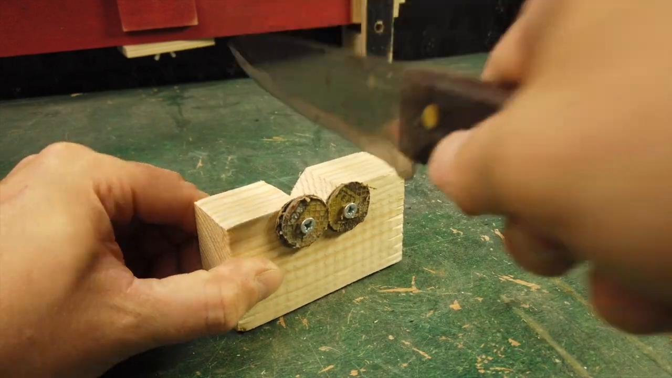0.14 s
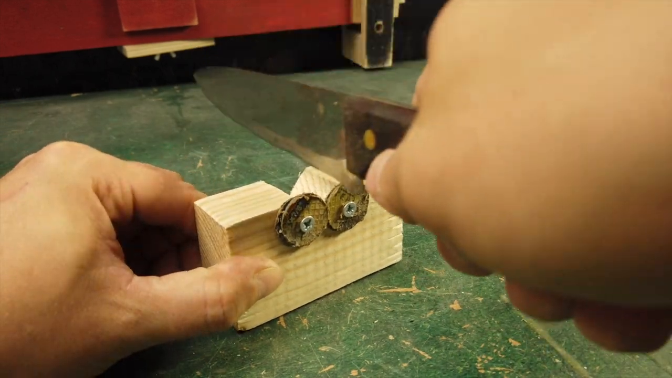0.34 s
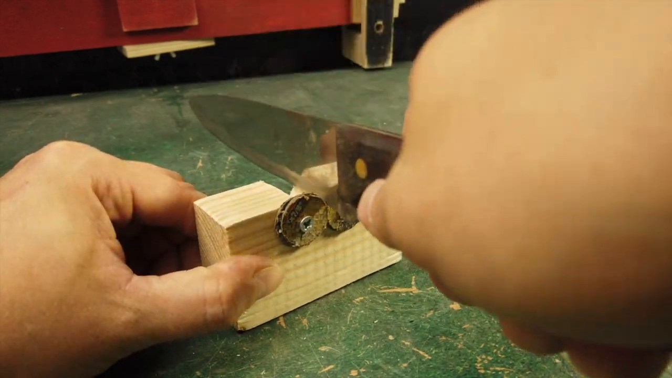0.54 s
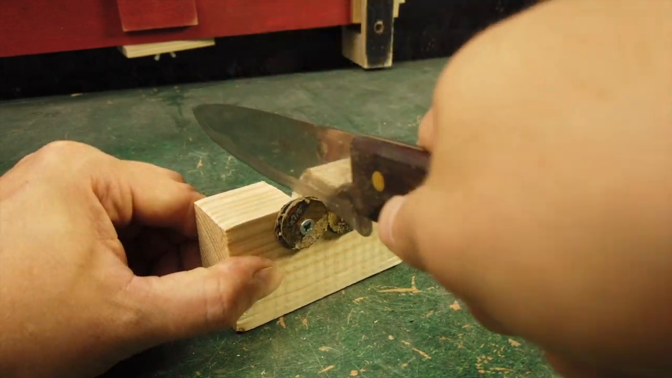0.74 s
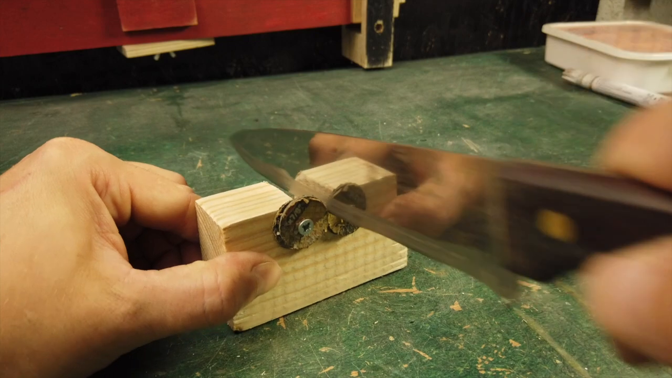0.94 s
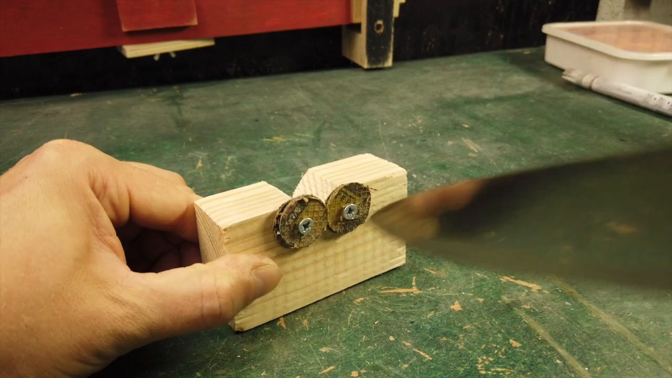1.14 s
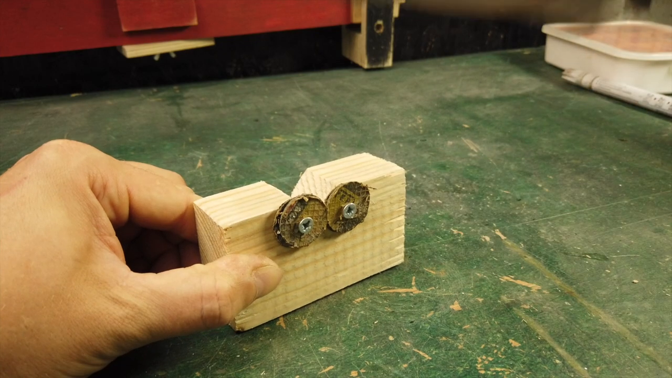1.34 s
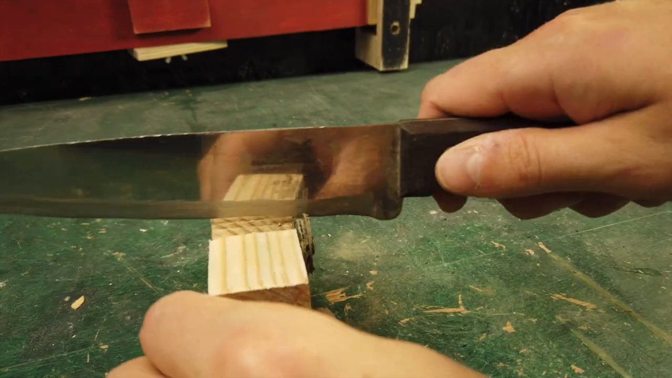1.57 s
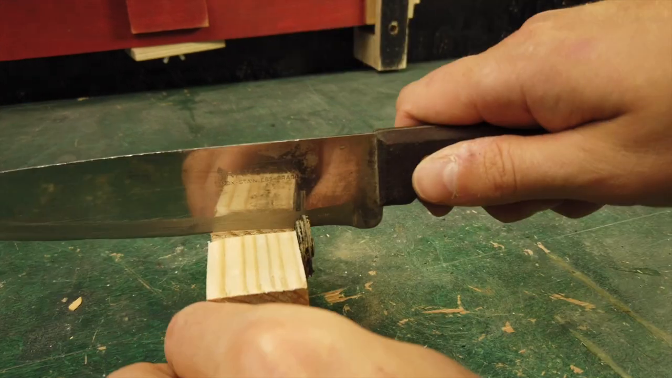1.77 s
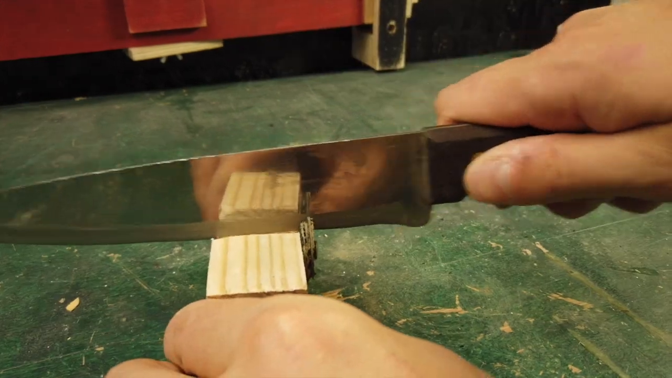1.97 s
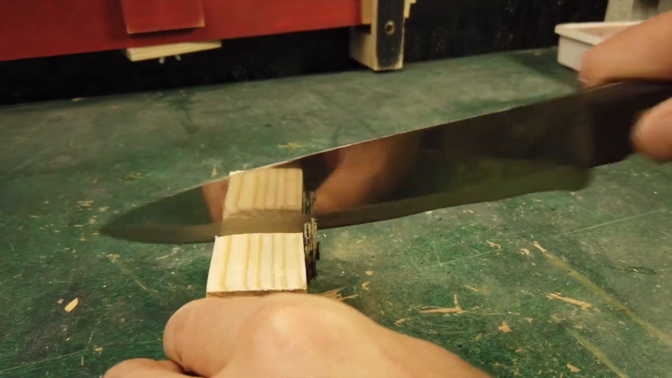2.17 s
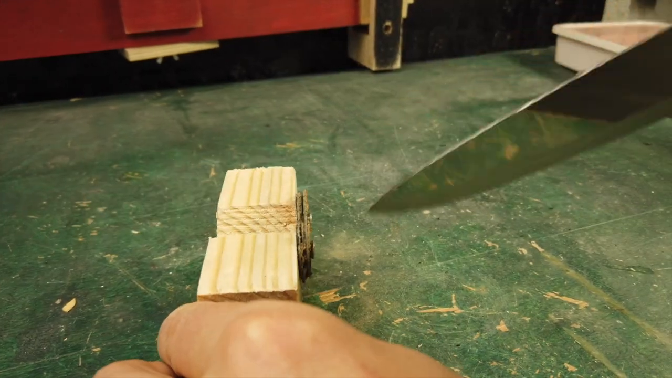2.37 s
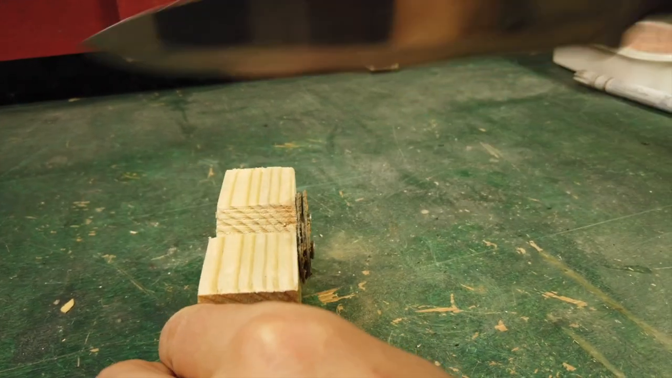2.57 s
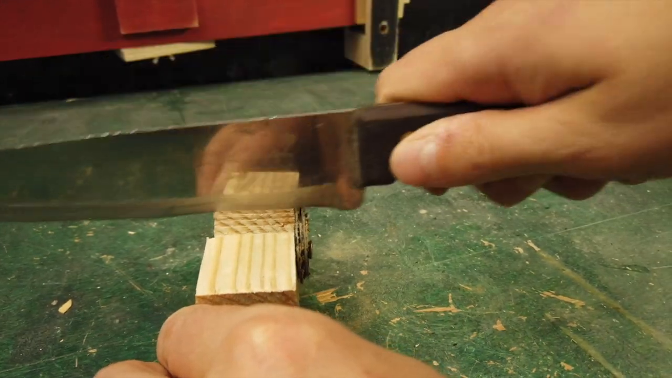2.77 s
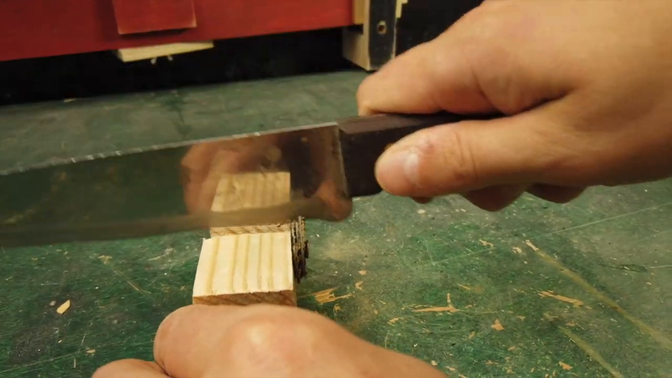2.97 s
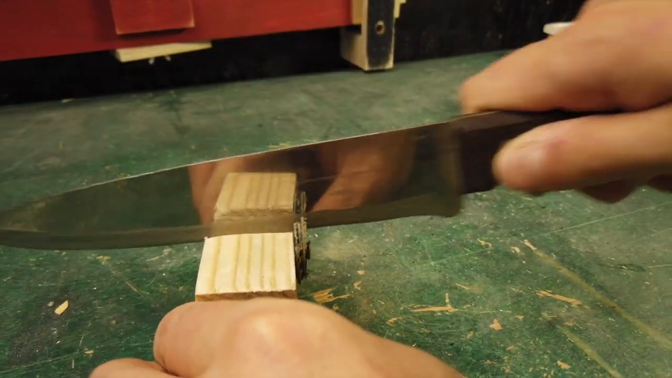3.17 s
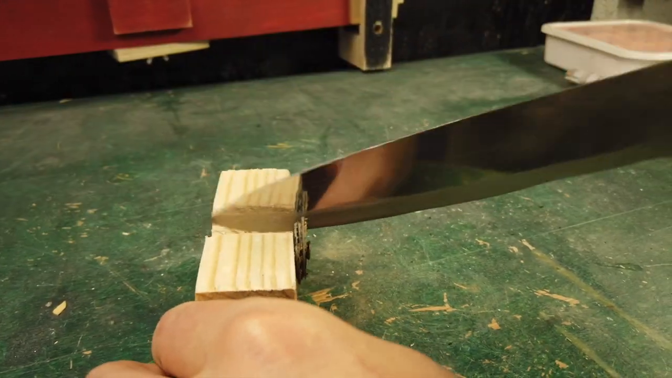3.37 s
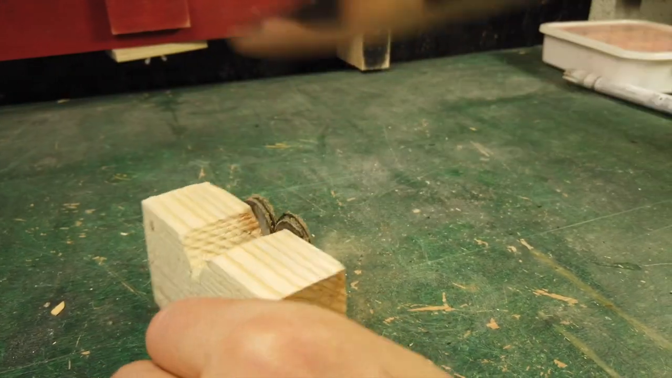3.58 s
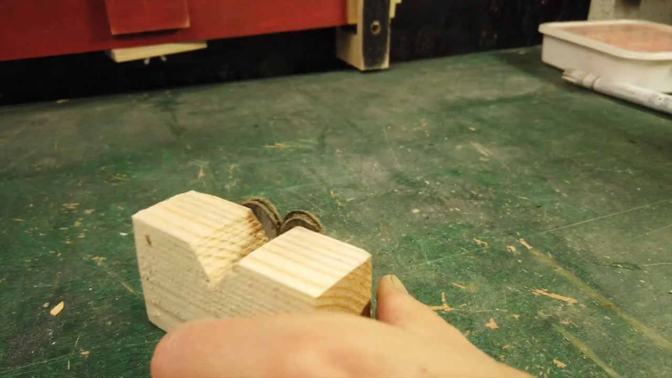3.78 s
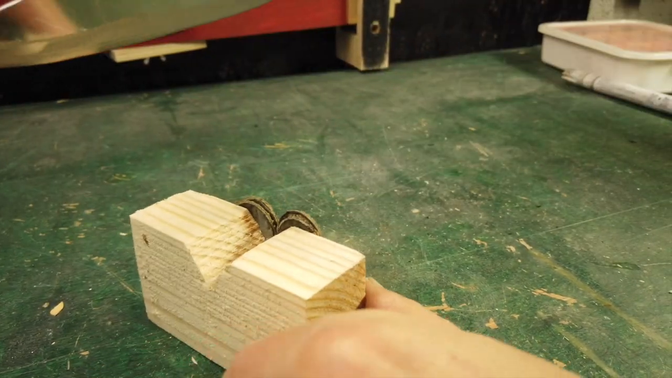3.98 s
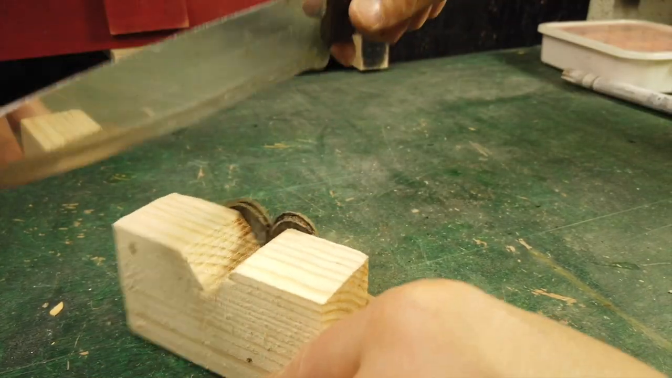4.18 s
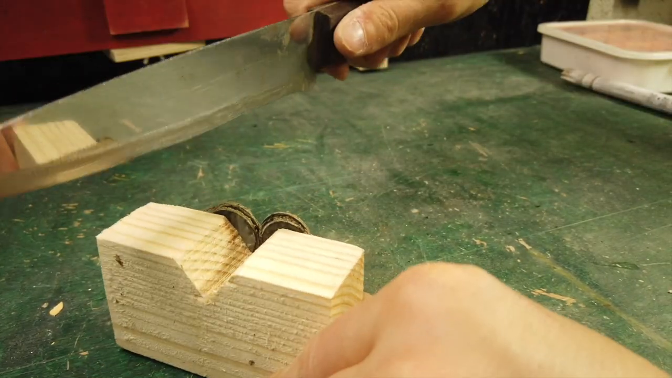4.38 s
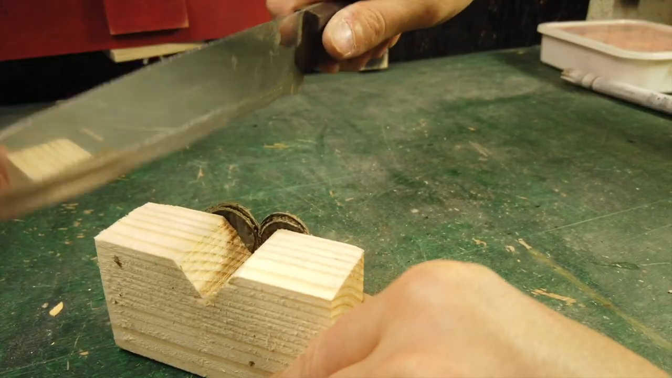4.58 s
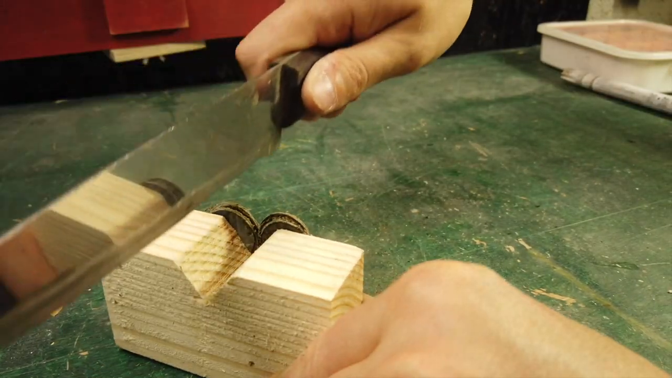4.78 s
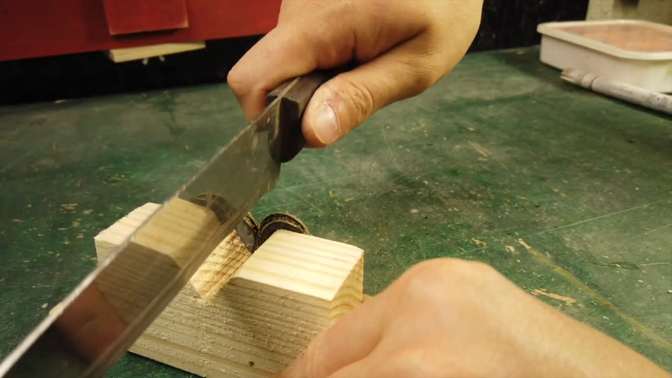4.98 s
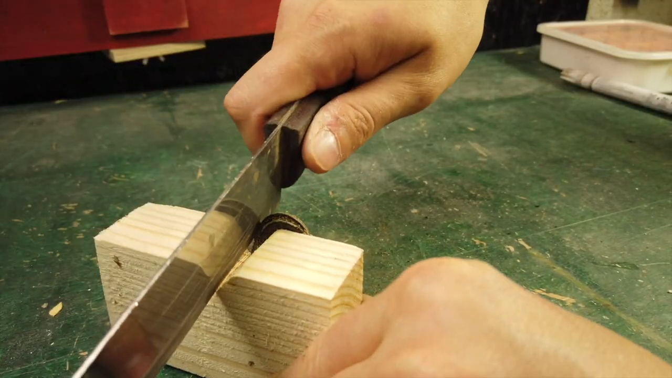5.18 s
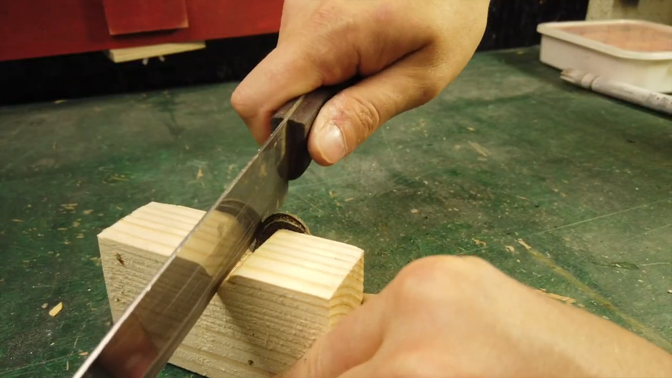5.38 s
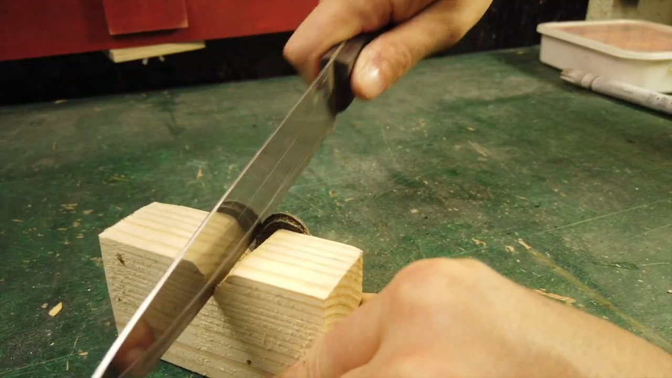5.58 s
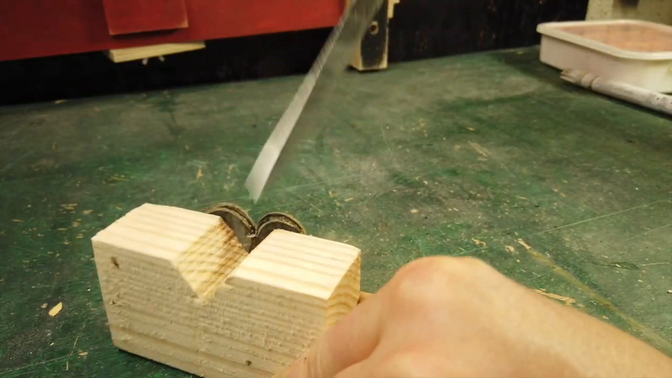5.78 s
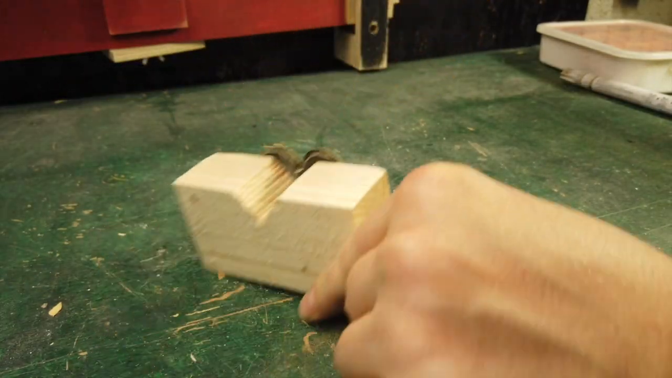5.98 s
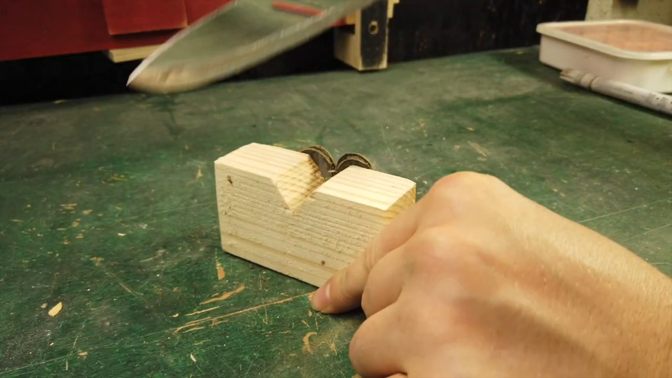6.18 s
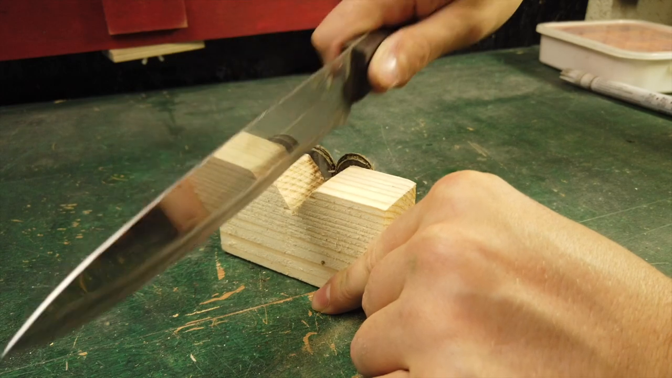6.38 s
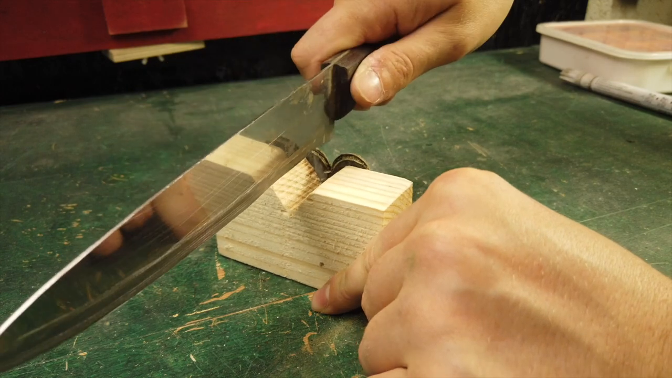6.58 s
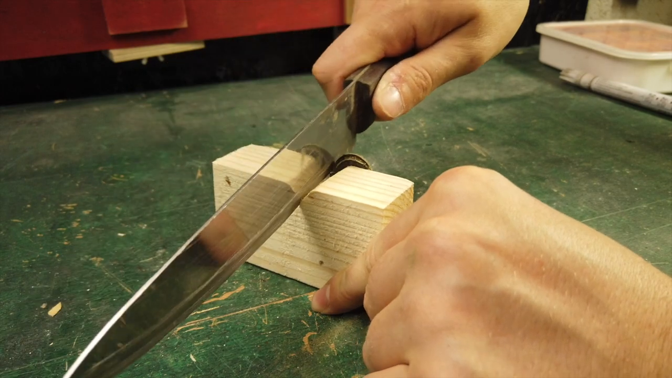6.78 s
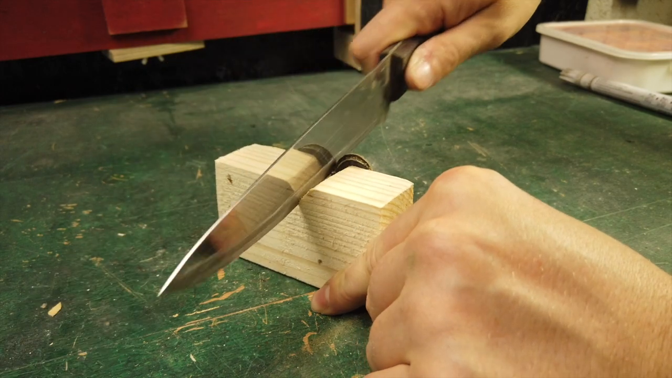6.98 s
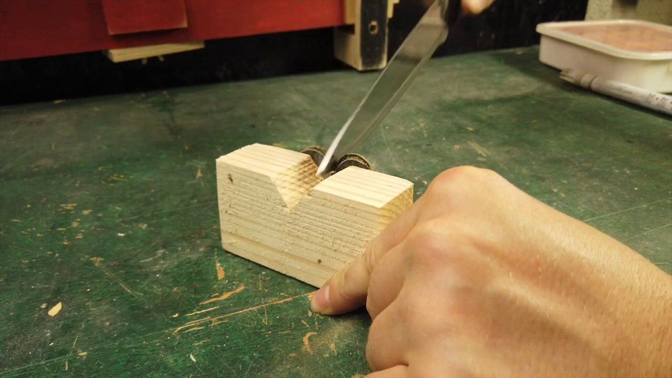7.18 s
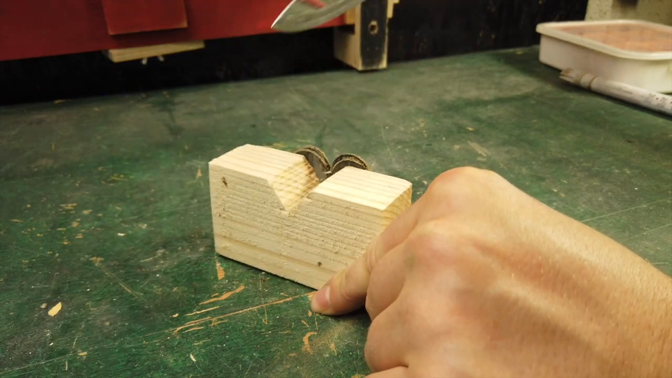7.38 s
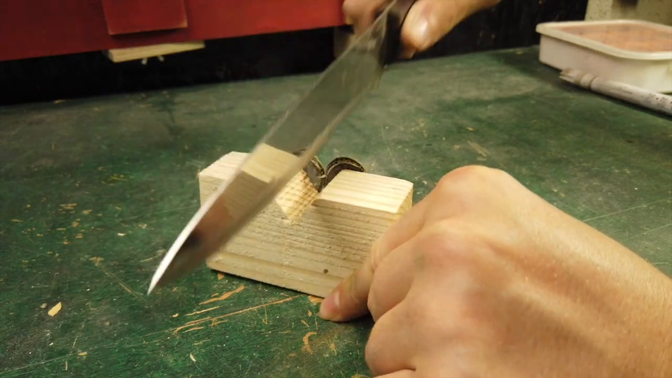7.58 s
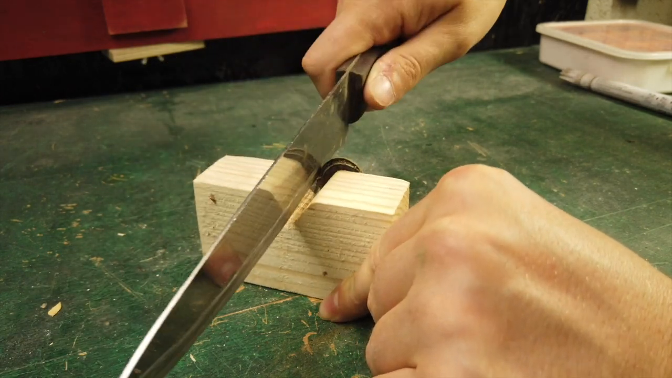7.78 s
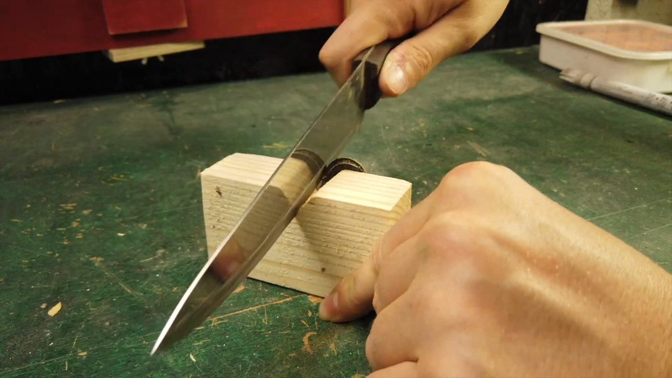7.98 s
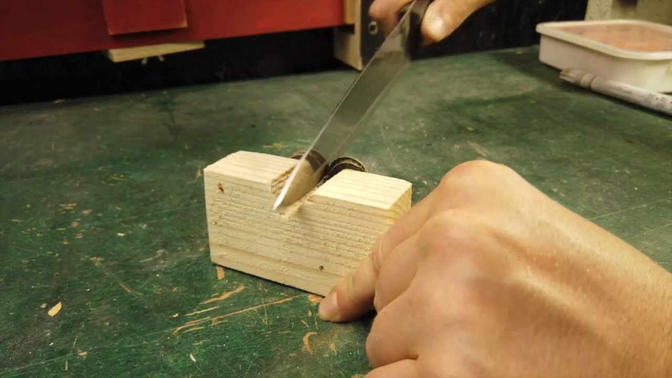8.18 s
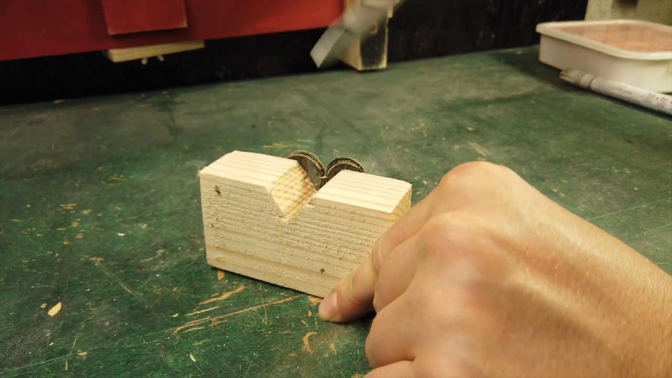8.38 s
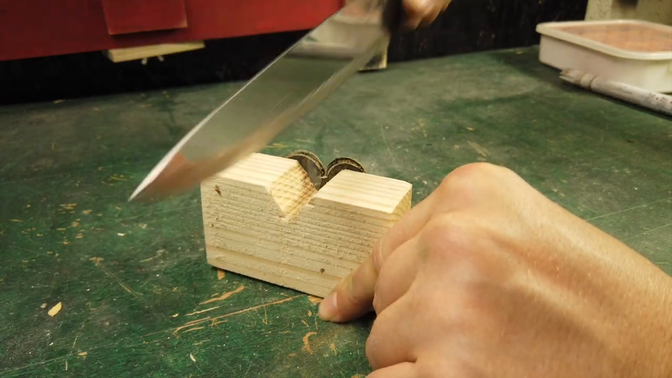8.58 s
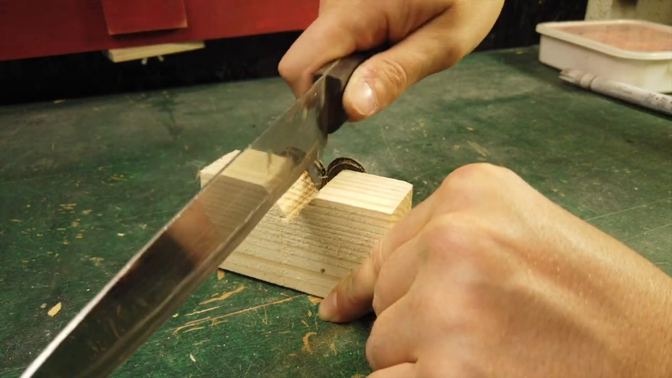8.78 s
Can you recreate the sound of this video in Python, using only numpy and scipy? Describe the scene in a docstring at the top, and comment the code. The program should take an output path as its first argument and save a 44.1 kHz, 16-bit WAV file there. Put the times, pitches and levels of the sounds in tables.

```python
"""Stick-slip and modal ringing of a knife on abrasive discs

A steel knife is pulled six times through two abrasive discs on a wooden block on a workbench, heard close.
Random grit impulses excite the modes of the blade; the drag shakes the modes of bench top and frame. During and
between the pulls short bursts ring the blade as ticks and the bench as knocks. Filtered noise gives soft rushes
between the pulls: rubbing, and pulls dying away in the room. Sparse decaying taps give the room, and steady
coloured noise its still air; left and right differ a little, in the treble only."""
import sys
import numpy as np
from scipy import signal
from scipy.fft import rfft, irfft, next_fast_len
from scipy.io import wavfile
from scipy.ndimage import uniform_filter1d

SR = 44100
rng = np.random.default_rng(int(sys.argv[2]) if len(sys.argv) > 2 else 0)


def store_wav(level_fs):
    """Save 16-bit WAV to argv[1]."""
    pcm = np.round(np.clip(np.atleast_2d(level_fs), -1, 1) * 32767)
    wavfile.write(sys.argv[1], SR, pcm.T.astype(np.int16))


N = 389844  # samples in the scene

# Drag of the edge on the grit, one curve a pull: t/s, level/dB
DRAG_CURVES = [
    [(0.8, -53), (0.876, -33), (0.976, -20.5), (0.99, -29.5), (1.03, -20), (1.146, -23), (1.174, -19),
     (1.235, -33.5), (1.27, -40)],
    [(1.975, -48.5), (2.012, -31), (2.082, -20), (2.2, -29), (2.22, -25.5), (2.328, -20.5), (2.438, -26.5),
     (2.48, -43)],
    [(3.14, -45), (3.258, -23), (3.314, -28.5), (3.33, -23), (3.394, -27), (3.442, -21), (3.562, -32.5),
     (3.58, -24)],
    [(5.425, -55.5), (5.509, -31.5), (5.561, -37), (5.707, -25.5), (5.745, -29.5), (5.829, -21),
     (5.87, -31.5)],
    [(6.845, -26), (6.879, -54), (7.045, -36), (7.067, -31), (7.329, -21.5), (7.35, -57)],
    [(7.985, -47.5), (8.073, -26.5), (8.2, -27), (8.313, -21), (8.381, -18), (8.39, -28.5)],
]
# How knife and block are held in each pull: index of the grip
PULL_GRIPS = (0, 1, 1, 2, 2, 2)
# For each pull, at full drag: brightness at heel/dB, brightness at tip/dB, bench top level/dB,
# frame level/dB, lift of the top's upper modes/dB
PULL_COLOURS = [(0, -2.5, -24.5, -30.5, -2.5), (-6.5, -2, -22.5, -31.5, 1.2), (-5.5, -2.5, -24, -33, 9.5),
                (2, 1.5, -25.5, -36.5, -6), (2, -0.4, -29, -34, -4.5), (-1.5, 1.3, -28, -28, 0.5)]
# Modes of blade and discs: f/Hz, width/Hz, half waves along the edge, start of the pattern/half waves,
# then relative level/dB in each of three grips
BLADE_MODES = [(1470, 57, 1.5, 0.12, -11.5, -6.5, -1), (1737, 62, 1.4, 0.53, -22.5, -3.5, -3),
               (2030, 14, 0.92, 0.098, -9.5, -13.5, -14.5), (2323, 31, 2, 0.5, -3.5, -3.5, -24.5),
               (2594, 50, 1, 0.073, 1.5, -22.5, -22), (2820, 30, 1.8, .4, -8.5, -1.5, -2.5),
               (3110, 20, 1.3, 0.54, -6, -19.5, -3), (3338, 34, 0.98, 0.43, -10.5, -7.5, -27),
               (3695, 73, 2.7, 0.83, 1.5, -13, -10), (3903, 20, 2.6, 0.91, -1, -7, -8.5),
               (4080, 97, 1.2, 0.34, -5, -5.5, -7), (4390, 20, 2.6, 0.59, 3, -4, -5),
               (4955, 66, 1.2, 0.14, -8, -19.5, -4.5), (5080, 70, 1.9, 0.38, -19.5, -16.5, -12),
               (5340, 27, 2.3, 0.22, -11, -11.5, 1), (5720, 52, 0.85, 0.046, -7.5, 4.5, -1),
               (7200, 210, 2.3, 0.36, -13, -8.5, 0.5), (7580, 120, 2.2, 0.73, -6.5, -13, 0.5),
               (8020, 290, 2, 0.22, -6, -15, -16), (8310, 230, 3.1, 0.63, -5.5, -14, -11),
               (9580, 84, 1.2, 0.18, -17, -15, -2.5), (11000, 50, 1.1, .1, -15, -20.5, -26.5),
               (12350, 43, 1.2, .7, -12, -22.5, -20.5), (13660, 200, 1.1, .3, -18, -26, -10.5)]
# Tearing between the modes: f/Hz, relative level/dB per Hz
TEARING_SPECTRUM = [(410, -34.5), (700, -3.5), (1130, -11), (1470, -2.5), (2430, -6), (3240, -1.5),
                    (4460, -5), (5650, -0.5), (6370, -8.5), (15200, -13), (16500, -27)]
# Light rubs of the blade as it is set down or lifted: t/s, drag level/dB, t60/s, brightness/dB
GRAZES = [(0.643, -56, 0.24, 10.5), (0.727, -48.5, 0.29, 2), (1.628, -43.5, 0.096, 3),
          (1.652, -48, 0.38, -2.5), (1.69, -48.5, .1, 2), (1.775, -50, .25, 2), (1.883, -54, .08, 6),
          (2.982, -42.5, 0.1, -0.5), (3.038, -32.5, 0.087, -6), (3.118, -39, 0.31, 1),
          (5.272, -39.5, 0.14, -3), (5.388, -52, 0.15, 1), (5.42, -36, .05, 4), (5.885, -50.5, 0.39, 14),
          (5.958, -28.5, 0.17, -1.3), (6.014, -35, 0.47, -2.5), (6.531, -14.5, 0.059, -9),
          (6.549, -42.5, 0.33, 7), (6.68, -59, .1, 13), (7.8, -27.5, .07, -5.5),
          (7.851, -28.5, 0.075, -1.5), (7.88, -57, 0.58, -3)]
# How the knife is held in each graze: index of the grip
GRAZE_GRIPS = (0, 0, 1, 1, 1, 1, 1, 1, 1, 1, 2, 2, 2, 2, 2, 2, 0, 0, 0, 2, 2, 2)
# Short bright clicks, alone or within the rasp of a pull: t/s, peak level/dB, strongest f/Hz, length/s
TICKS = [(0.059, -34.5, 1600, 0.0014), (0.127, -44, 1500, 0.003), (0.1775, -35.5, 1470, 0.0056),
         (0.278, -62, 2870, 0.0023), (0.2965, -35.5, 3070, 0.0024), (0.5567, -35, 3100, 0.0019),
         (0.644, -43, 4040, 0.0048), (0.698, -44, 5330, 0.0043), (0.7297, -38.5, 2340, 0.0028),
         (0.7811, -44, 4000, 0.0076), (1.2416, -15, 9000, 0.0028), (1.3844, -49, 3240, 0.0046),
         (1.411, -43, 1470, 0.0019), (1.6273, -26.5, 9400, 0.0022), (1.655, -46, 3660, 0.0051),
         (1.689, -38.5, 4400, 0.0091), (1.758, -40.5, 1710, 0.0044), (1.7858, -41.5, 1690, 0.0083),
         (1.8861, -44, 3600, 0.0039), (1.991, -31.5, 5640, 0.0031), (2.0598, -12, 5840, 0.0014),
         (2.1962, -12, 3200, 0.0097), (2.64, -50, 5400, 0.0089), (2.9831, -35.5, 1330, 0.0094),
         (3.0433, -37.5, 5200, 0.0046), (3.1246, -28, 1480, 0.014), (3.153, -33, 1700, 0.0026),
         (3.327, -11, 7600, 0.002), (4.6458, -49.5, 1820, 0.004), (4.982, -56.5, 1580, 0.0043),
         (5.276, -47, 4900, 0.0051), (5.393, -62, 1480, 0.004), (5.4195, -32, 1790, 0.0014),
         (5.8747, -8, 7800, 0.0039), (5.9638, -26, 5630, 0.0017), (6.0205, -31.5, 5350, 0.0082),
         (6.2487, -47.5, 1350, 0.0038), (6.537, -24.5, 3940, 0.01), (6.5887, -35, 4940, 0.0034),
         (6.628, -43.5, 1400, 0.0044), (6.684, -48, 4170, 0.0047), (6.846, -32.5, 2790, 0.0036),
         (7.0808, -18, 5520, 0.003), (7.1165, -14.5, 3380, 0.0026), (7.1882, -15, 3200, 0.0021),
         (7.2794, -12.5, 3180, 0.0026), (7.5223, -52, 1290, 0.0033), (7.798, -32, 1480, 0.0028),
         (7.807, -20.5, 1480, 0.0029), (7.856, -33, 1480, 0.0033), (7.9872, -29.5, 1640, 0.0035),
         (8.098, -16, 5560, 0.0044), (8.147, -21, 2960, 0.0029), (8.1964, -11, 3150, 0.006),
         (8.2871, -15, 3090, 0.004), (8.3935, -18.5, 5400, 0.0063)]
# Blade singing on one mode, by locked chatter or lifted free: t/s, hold/s, f/Hz, rms level/dB, t60/s
SONGS = [(.643, .015, 3840, -59, .25), (1.12, .065, 3170, -30.5, .17), (1.2, .02, 5800, -34, 0.11),
         (1.245, .012, 3110, -43.5, .31), (1.996, .14, 5645, -30.5, 0.14), (2.006, .086, 4160, -35, .12),
         (2.128, .081, 3340, -27, .096), (2.235, .035, 5100, -35.5, .1), (2.245, .11, 3370, -31, 0.097),
         (2.268, .037, 3780, -31.5, 0.11), (2.375, .06, 5680, -43, .14), (3.191, .096, 4240, -34.5, .084),
         (3.197, .35, 5700, -32, .12), (3.284, .087, 3300, -36, .1), (3.318, .24, 1710, -39, .16),
         (3.414, .04, 4230, -38.5, .068), (3.423, .1, 2884, -42, .1), (5.422, .1, 1790, -49, .2),
         (5.559, .29, 1728, -42, .1), (5.595, .21, 5640, -35.5, .093), (5.657, .2, 7060, -34, .058),
         (5.779, .057, 3270, -32.5, 0.086), (6.015, .12, 5580, -60, .2), (6.542, .023, 4040, -40, .18),
         (6.545, .05, 4930, -48, .25), (6.546, .014, 2165, -41, .12), (6.902, .12, 1750, -52, .12),
         (6.911, .14, 5630, -45.5, 0.11), (7.057, .24, 3130, -34.5, .16), (7.153, .16, 7170, -40, 0.064),
         (7.306, .021, 5500, -39.5, .2), (7.328, .03, 3930, -46.5, .3), (7.803, .011, 1488, -30, .14),
         (7.83, .15, 1500, -60, .28), (7.985, .1, 1625, -43, .13), (7.986, .1, 4120, -43, .09),
         (8.062, .33, 7050, -40.5, .08), (8.141, .12, 3020, -32, 0.11), (8.22, .036, 3630, -31, .11),
         (8.33, .043, 5480, -31, 0.15), (8.402, .018, 3970, -46, .28), (8.409, .017, 5480, -47.5, .3)]
# Modes of bench top and block: f/Hz, width/Hz, relative level/dB
TOP_MODES = [(221, 5.3, -10), (258.2, 7.9, 14), (324, 34, -2), (357.4, 16.3, 15), (408, 15, 7),
             (475.3, 18, 11), (528.2, 14, 7.5), (580, 12, -2), (650, 19, -19), (740, 23, -24.5),
             (850, 25, -30), (306, 65, -13), (600, 72, -14), (730, 230, -11)]
# Modes of the bench frame: f/Hz, width/Hz, relative level/dB
FRAME_MODES = [(32.2, 21, -4.5), (40, 19, 3.5), (49.7, 11, -6), (67, 6.8, -6), (78.86, 7.6, 9.5),
               (98, 4, -3.5), (107.2, 4.7, 5.5), (124, 5.3, -11), (138, 3, -7)]
# Block on the bench top: t/s, peak level/dB, strongest f/Hz, length/s
KNOCKS = [(0.058, -43, 348, 0.0042), (0.154, -31, 318, 0.0037), (0.654, -35, 352, 0.0021),
          (0.732, -21, 241, 0.0038), (1, -17.5, 243, 0.0022), (1.051, -29, 246, 0.001),
          (1.408, -44, 248, 0.0029), (1.627, -27, 255, 0.0038), (1.728, -23.5, 358, 0.0012),
          (1.757, -23, 376, 0.0037), (1.888, -24, 350, 0.0015), (2.003, -18, 362, 0.0036),
          (2.071, -15.5, 392, 0.0015), (2.637, -33.5, 360, 0.0047), (2.979, -35, 597, 0.0087),
          (3.13, -28, 385, 0.0073), (3.151, -32, 363, 0.0033), (3.618, -30, 366, 0.003),
          (3.757, -26, 250, 0.0027), (4.093, -46, 242, 0.004), (4.177, -42, 358, 0.0029),
          (4.231, -21, 362, 0.0016), (4.641, -59, 349, 0.003), (5.292, -16, 343, 0.0039),
          (5.998, -27, 245, 0.0032), (6.166, -30, 246, 0.001), (6.531, -30.5, 346, 0.0075),
          (6.862, -35, 372, 0.0044), (7.19, -20, 554, 0.003), (7.291, -18, 372, 0.0035),
          (7.802, -43, 751, 0.0028), (7.989, -28.5, 555, 0.0033), (8.396, -24.5, 353, 0.0041)]
# Pushes that rock the frame: t/s, peak level/dB, strongest f/Hz, length/s
PUSHES = [(0.177, -26.5, 33.2, 0.0095), (0.559, -25, 64.7, 0.018), (0.718, -15, 53.4, 0.004),
          (1.618, -33, 111, 0.013), (1.731, -28, 78.1, 0.011), (1.876, -24.5, 53.5, 0.0082),
          (2.633, -32.5, 46.2, 0.01), (3.158, -32.5, 80.7, 0.0084), (4.124, -50, 53.8, 0.01),
          (5.291, -22.5, 79.5, 0.011), (5.3, -23, 40, 0.0054), (6.2, -18, 40, 0.004),
          (6.575, -22, 98.4, 0.019), (6.851, -31, 54.5, 0.0085), (7.267, -47, 86.1, 0.01),
          (7.58, -27, 82, 0.0061), (7.854, -23, 53, 0.019), (7.977, -24.5, 40.4, 0.0084)]
# Block rocked or shifted: t/s, hold/s, bench top level/dB, frame level/dB, lift of the upper modes/dB
JOLTS = [(-.01, 0.15, -47, -48, -11), (.16, 0.044, -41, -45.5, -18), (0.29, .12, -70, -51.5, 8),
         (0.547, .08, -60, -55, -6), (.645, 0.017, -52.5, -36.5, -6), (.728, 0.034, -36.5, -26.5, -22),
         (1.41, .02, -47.5, -48, -12), (1.625, 0.07, -42.5, -36.5, -17), (1.75, 0.013, -29.5, -41.5, -5),
         (1.885, 0.044, -43.5, -37.5, -13), (2.635, 0.02, -39, -49, -2), (2.68, 0.027, -63, -50, -2.5),
         (2.98, 0.0069, -33, -54.5, 12.5), (3.05, 0.019, -45, -55, 0), (3.116, 0.029, -25, -43, -4),
         (3.397, 0.079, -23.5, -32, 7.5), (3.62, 0.061, -36, -32, -8), (3.755, 0.038, -29.5, -34, -8),
         (3.92, 0.023, -44, -41.5, -3), (4.07, 0.17, -59, -47.5, 6), (4.232, 0.083, -33, -44, -5),
         (4.645, .01, -62.5, -55, 2.5), (5.2, 0.1, -65, -56.5, -2), (5.287, 0.031, -30, -37, -4),
         (5.415, 0.08, -40, -33, -2), (5.798, 0.032, -26.5, -37, 0), (5.88, 0.18, -36, -43, 6),
         (6.0, 0.019, -25, -43, -12), (6.14, 0.091, -39.5, -33.5, -14), (6.531, 0.016, -31, -33.5, 4),
         (6.59, 0.038, -37, -33, -15), (6.855, .02, -30.5, -33, -5), (7.57, 0.04, -45, -47, -18),
         (7.8, 0.11, -36, -37.5, -9)]
# Soft rushes of noise, rubbing and pulls dying away in the room: t/s, hold/s, level/dB, brightness/dB
RUSHES = [(-.05, 0.061, -53.5, -4.5), (0.07, 0.16, -56.5, -7), (0.297, 0.21, -65.5, -6),
          (0.573, 0.14, -64, -8), (1.273, 0.035, -52.5, -1), (1.404, 0.0044, -58, -5.5),
          (1.458, 0.16, -59, 2), (1.803, 0.14, -65, 0), (2.488, 0.026, -55.5, -3),
          (2.631, 0.0068, -66, 19.5), (3.582, 0.066, -45, -6.5), (3.737, 0.024, -48.5, -5),
          (3.77, 0.12, -57, -6), (3.955, 0.086, -49, -2), (4.169, 0.059, -56.5, 2), (4.264, .13, -49.5, -2),
          (4.647, .01, -66.5, -5), (4.98, .005, -68.5, -3.5), (5.017, 0.13, -69.5, -3),
          (5.22, 0.047, -65.5, 2), (6.188, .07, -66, -12), (6.26, 0.22, -71, -6.5), (6.79, .05, -67, -2),
          (7.372, 0.018, -54, -4), (7.511, 0.029, -58.5, -2), (7.56, 0.18, -74, 5), (8.46, 0.011, -62, 5)]
# Spectrum of the rushes: f/Hz, relative level/dB per Hz
RUSH_SPECTRUM = [(530, -32.5), (900, 4), (1600, 2), (1750, 2), (2760, -2.5), (3340, -2.5), (5680, -4),
                 (9090, -5), (14200, -11.5), (16000, -25)]
# Still air of the workshop: f/Hz, relative level/dB per Hz
AIR_SPECTRUM = [(15, -31.5), (25, 7.5), (70, 9.5), (108, -36.5), (146, -16.5), (177, -27.5), (313, -38.5),
                (349, -21), (410, -41), (15200, -57), (16500, -63.5)]
# Reverberation of the room: f/Hz, t60/s
ROOM_DECAY = [(300, .6), (1100, 0.38), (3000, .34), (6000, 0.24), (9000, 0.24), (15000, 0.22)]

FULL_DRAG_DB = -23.5  # reference for brightness and bench level
BRIGHT_PER_DB, TOP_PER_DB, FRAME_PER_DB = -0.22, 0.76, 0.28  # how each follows the drag, dB per dB
BENCH_LAG_S = 0.019  # the heavy bench smooths the drag
JOLT_RISE_S, TOP_FADE_DB_PER_S, FRAME_FADE_DB_PER_S = 0.003, 182.5, 142.5
TOP_REST_DB, FRAME_REST_DB = -80.5, -62
WOOD_HZ = 772  # the wood carries little above this
RUSH_RISE_S, RUSH_RISE_PER_HOLD = 0.0048, 0.52  # longer rushes start more softly
RUSH_FADE_DB_PER_S, RUSH_REST_DB = 199, -76
SING_WIDTH, SING_WIDTH_PER_S = 0.0099, 0.08  # share of the pitch; a long song wanders and is broader
CRACK_PER_PITCH, CRACK_WIDTH_HZ = 1.7, 7900  # the crack of a blow is a broad band above its pitch
AIR_DB = -49
WIDE_HZ = 2900  # left and right differ only above this
EDGE_HZ = 15900  # upper band limit


def blade():
    """Superposition: pulls, grazes, ticks and singing add linearly."""
    return pulls() + grazes() + ticks() + singing()


def pulls():
    """Friction drive: drag sets the force, and brightness falls as drag grows."""
    out = np.zeros(N)
    for curve, (heel_db, tip_db, *_), grip in zip(DRAG_CURVES, PULL_COLOURS, PULL_GRIPS):
        s, drag_db = np.transpose(curve)
        bright_db = np.interp(s, s[[0, -1]], [heel_db, tip_db])
        bright_db = bright_db + BRIGHT_PER_DB * (drag_db - FULL_DRAG_DB)
        add(out, s[0], rubbed_edge(s, drag_db, bright_db, grip))
    return out


def grazes():
    """Decaying friction: each light rub loses 30 dB of drag in half its t60."""
    out = np.zeros(N)
    for (s, db, t60, bright_db), grip in zip(GRAZES, GRAZE_GRIPS):
        add(out, s, rubbed_edge([s, s + t60 / 2], [db, db - 30], [bright_db] * 2, grip))
    return out


def rubbed_edge(s, drag_db, bright_db, grip):
    """Modal excitation at a moving point: each mode swells and fades by its pattern along the edge."""
    t = np.arange(s[0], s[-1] + 0.1, 1 / SR)
    place = (t - s[0]) / (s[-1] - s[0])  # 0 at the heel, 1 at the tip
    landing = np.clip((t - s[0]) / 0.01, 0, 1)
    leaving = np.clip((s[-1] - t) / 0.0071, 0, 1)
    force = amp(np.interp(t, s, drag_db)) * landing * leaving
    grit = grains(len(t), per_s=20000, spread_db=2.3, clump_db=2.6, clump_per_s=150)
    lift = amp(np.interp(t, s, bright_db))
    rings = 0
    for hz, width, waves, start, *grip_db in BLADE_MODES:
        pattern = 0.25 + np.cos(np.pi * (waves * place + start)) ** 2
        tilt = lift ** np.log2(hz / 4000)  # brightness per octave from 4 kHz
        flutter = amp(0.8 * wander(len(t), per_s=82))
        drive = grit * force * pattern * tilt * flutter
        rings = rings + amp(grip_db[grip]) * mode(drive, hz, width)
    tearing = patchy(coloured(grit, TEARING_SPECTRUM), depth_db=2.2)
    return amp(7) * rings + amp(-3) * force * brighter(tearing, lift)


def ticks():
    """Impulse response of damped modes: clicks ring the blade's modes at 5.5 times their width."""
    damped = [(m[0], 5.5 * m[1], np.mean(m[4:])) for m in BLADE_MODES]
    return blows(TICKS, damped, octaves=0.2, push=0, crack_db=-6.5, ring_s=0.15)


def singing():
    """Narrow-band resonance: noise confined to one mode starts softly, holds and decays freely."""
    out = np.zeros(N)
    noises = rng.standard_normal((len(SONGS), SR))
    for (s, hold, hz, db, t60), noise in zip(SONGS, noises):
        t = np.arange(round((hold + t60) * SR)) / SR
        width = hz * (SING_WIDTH + SING_WIDTH_PER_S * hold)
        narrow = mode(mode(noise, hz, width), hz, 4.0 * width)
        tone = evened(narrow[-len(t):])  # the end, where the resonance has built up
        rise = np.minimum(t / (0.16 * hold), 1)
        decay_db = -60 * np.maximum(t - hold, 0) / t60
        add(out, s, tone * rise * amp(db + decay_db))
    return out * amp(2.9 * wander(N, per_s=190))  # roughness


def bench():
    """Low-pass transmission: wood passes the lower modes of top and frame, shaken or struck."""
    knocks = blows(KNOCKS, TOP_MODES, octaves=0.46, push=0.37, crack_db=-30.5, ring_s=0.35)
    pushes = blows(PUSHES, FRAME_MODES, octaves=0.25, push=2.5, crack_db=-80, ring_s=0.4)
    wood = signal.butter(6, WOOD_HZ, fs=SR, output="sos")
    return signal.sosfilt(wood, shaken_bench() + knocks + pushes)


def shaken_bench():
    """Forced vibration: uneven random impulses drive the modes of top and frame."""
    top_gain, frame_gain, lift = shaking()
    judder = grains(N, per_s=1200, spread_db=2.0, clump_db=1.2, clump_per_s=40)
    sway = grains(N, per_s=300, spread_db=2.0, clump_db=0.8, clump_per_s=15)
    top = 0
    for hz, width, db in TOP_MODES:
        tilt = lift ** np.log2(hz / 350)  # lift per octave from 350 Hz
        top = top + amp(db) * mode(judder * top_gain * tilt, hz, width)
    frame = evened(sum(amp(db) * mode(sway, hz, width) for hz, width, db in FRAME_MODES))
    return amp(7.5) * top + frame * frame_gain


def shaking():
    """Addition of powers: pulls and jolts set the gains of top and frame and the lift of upper modes."""
    top, frame, weighted_lift = amp(2 * TOP_REST_DB), amp(2 * FRAME_REST_DB), 0
    shakes = []  # start, hold, top dB, frame dB, lift dB
    t = np.arange(0, N / SR + 0.01, 1e-3)
    for curve, (_, _, top_db, frame_db, up_db) in zip(DRAG_CURVES, PULL_COLOURS):
        s, drag_db = np.transpose(curve)
        end = s[-1] - BENCH_LAG_S
        held_db = np.interp(np.minimum(t, end), s, drag_db)  # the last drag is held on
        over_db = uniform_filter1d(held_db - FULL_DRAG_DB, round(1000 * BENCH_LAG_S))
        shakes.append((s[0], s[-1] - s[0], top_db + TOP_PER_DB * over_db,
                       frame_db + FRAME_PER_DB * over_db, up_db))
    for s, hold, top_db, frame_db, up_db in shakes + list(JOLTS):
        power = amp(2 * top_db) * swell(s, hold, JOLT_RISE_S, TOP_FADE_DB_PER_S)
        top = top + power
        weighted_lift = weighted_lift + power * up_db
        frame = frame + amp(2 * frame_db) * swell(s, hold, JOLT_RISE_S, FRAME_FADE_DB_PER_S)
    return sampled(np.sqrt(top)), sampled(np.sqrt(frame)), sampled(amp(weighted_lift / top))


def blows(events, modes, octaves, push, crack_db, ring_s):
    """Impulsive excitation: a push with a noise burst rings the modes nearest its pitch the most."""
    out, t = np.zeros(N), np.arange(round(ring_s * SR)) / SR
    bursts = rng.standard_normal((len(events), len(t)))
    for (s, db, near_hz, length), noise in zip(events, bursts):
        u = t / max(length, 2e-4)
        shape = (1 - np.exp(-8.0 * u)) * np.exp(-u)
        ring = 0
        for k, (hz, width, mode_db) in enumerate(modes):
            nearness = 1 / (1 + (np.log2(hz / near_hz) / octaves) ** 2)
            gain = (-1) ** k * amp(mode_db) * np.sqrt(1 / width)  # neighbours start in opposite sense
            ring = ring + gain * nearness * mode((noise + push) * shape, hz, width)
        crack = mode(noise * shape, min(CRACK_PER_PITCH * near_hz, SR / 4), CRACK_WIDTH_HZ)
        add(out, s, amp(db) * (ring / abs(ring).max() + amp(crack_db) * crack / abs(crack).max()))
    return out


def rushes():
    """Addition of powers in coloured noise: soft rushes add, and the loudest sets the brightness."""
    rush = patchy(coloured(rng.standard_normal(N), RUSH_SPECTRUM), depth_db=2.2)
    rush = rush * amp(1.2 * wander(N, per_s=50))
    powers = []
    for s, hold, db, _ in RUSHES:
        rise = RUSH_RISE_S + RUSH_RISE_PER_HOLD * hold
        powers.append(amp(2 * db) * swell(s, hold, rise, RUSH_FADE_DB_PER_S))
    powers = np.array(powers)
    power = powers.sum(axis=0) + amp(2 * RUSH_REST_DB)
    bright_db = np.transpose(RUSHES)[3] @ powers / power
    return sampled(np.sqrt(power)) * brighter(rush, sampled(amp(bright_db)))


def room(x, count):
    """Reverberation: sparse taps of random sign decay at each band's own rate; one tail a row."""
    taps = np.zeros((count, SR // 2))
    slots = np.arange(150, SR // 2 - 20, 20)
    at = slots + rng.integers(0, 20, (count, len(slots)))
    np.put_along_axis(taps, at, rng.choice([-1.0, 1.0], at.shape), 1)
    hz, t, z = signal.stft(taps, SR, nperseg=256)
    decay = amp(-60 * t / read(ROOM_DECAY, hz)[:, None])
    tail = signal.istft(z * decay, SR, nperseg=256)[1]
    return signal.fftconvolve(x[None], tail / np.linalg.norm(tail[0]), axes=1)[:, :N]


def stereo_smear(x):
    """Stereo spread: convolution with a short decaying noise of unit energy."""
    smear = rng.standard_normal(2048) * np.exp(-np.arange(2048) / 500.0)
    return signal.oaconvolve(x, smear / np.linalg.norm(smear))[:N]


def still_air():
    """Stationary background: steady noise shaped by the workshop's spectrum."""
    return amp(AIR_DB) * coloured(rng.standard_normal(N), AIR_SPECTRUM)


def mode(x, hz, width):
    """Two-pole resonance with a peak gain of 1."""
    r, turn = np.exp(-np.pi * width / SR), 2 * np.pi * hz / SR
    return (1 - r * r) / 2 * signal.lfilter([1, 0, -1], [1, -2 * r * np.cos(turn), r * r], x)


def grains(size, per_s, spread_db, clump_db, clump_per_s):
    """Shot noise: impulses of random sign and size come in clumps, at rms 1."""
    draw = rng.random((3, size))
    sizes = amp(-spread_db * np.log(draw[0] + 3e-3)) * np.sign(draw[1] - 0.5)
    present = draw[2] < per_s / SR
    return evened(sizes * present * amp(clump_db * wander(size, clump_per_s)))


def wander(size, per_s):
    """Low-pass random modulation, softly bounded, of rms near 1."""
    span = max(round(SR / per_s), 1)
    smooth = uniform_filter1d(uniform_filter1d(rng.standard_normal(size), span), span)
    return 2 * np.tanh(evened(smooth) / 2)


def patchy(x, depth_db):
    """Time-frequency modulation: patches of the spectrum swell and fade by chance, at rms 1."""
    z = signal.stft(x, nperseg=256, noverlap=192)[2]
    patches = uniform_filter1d(rng.standard_normal(z.shape), size=5, axis=0)
    patches = uniform_filter1d(patches, size=14, axis=1)
    z = z * amp(depth_db * evened(patches))
    return evened(signal.istft(z, nperseg=256, noverlap=192)[1][:len(x)])


def coloured(x, points):
    """Spectral shaping: multiplies the spectrum of x by a curve, at rms 1."""
    size = next_fast_len(len(x))
    gain = amp(read(points, np.fft.rfftfreq(size, 1 / SR)))
    return evened(irfft(rfft(x, size) * gain, size)[:len(x)])


def brighter(x, lift):
    """Band splitting: scales what a short moving average leaves, the treble."""
    low = uniform_filter1d(x, size=7)
    return low + lift * (x - low)


def swell(s, hold, rise, fade_db_per_s):
    """Exponential decay of power after a rise and a hold; one value a millisecond."""
    t = np.arange(0, N / SR + 0.01, 1e-3) - s
    fade = amp(-2 * fade_db_per_s * np.clip(t - rise - hold, 0, 2))
    return np.clip(t / rise, 0, 1) ** 2 * fade


def sampled(v):
    """Linear interpolation from one value a millisecond to one a sample."""
    return np.interp(np.arange(N) / SR, np.arange(len(v)) / 1000, v)


def read(points, hz):
    """Interpolates a table over logarithmic frequency."""
    f, value = np.transpose(points)
    return np.interp(np.log(hz + 1), np.log(f + 1), value)


def amp(db):
    """Amplitude ratio of a level in dB."""
    return 10 ** (np.asarray(db) / 20)


def evened(x):
    """Normalisation to rms 1."""
    return x / np.sqrt(np.mean(x ** 2) + 1e-20)


def add(mix, s, sound):
    """Superposes a sound on the mix, in place, from time s in seconds."""
    part = mix[round(s * SR):][:len(sound)]
    part += sound[:len(part)]


def scene():
    """Mid and side: the mid carries every source; left and right differ a little, only in the treble."""
    near = blade() + rushes()
    both, apart = room(near, count=2)
    apart = amp(-22) * apart + amp(-13.5) * stereo_smear(near)
    mid = near + amp(-12.5) * both + bench() + still_air()
    treble = signal.butter(10, WIDE_HZ, "high", fs=SR, output="sos")
    side = signal.sosfilt(treble, apart)
    return np.array([mid + side, mid - side])


def record(dry):
    """Band limitation: a linear-phase low-pass filter."""
    low_pass = signal.firwin(255, EDGE_HZ, window=("kaiser", 9), fs=SR)
    return signal.oaconvolve(dry, low_pass[None], "same")


dry = scene()
out = record(dry)
store_wav(out)
```